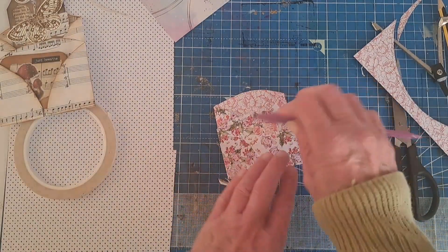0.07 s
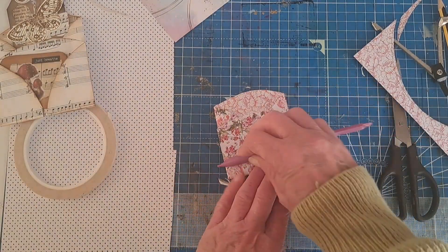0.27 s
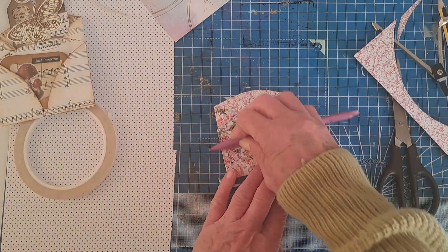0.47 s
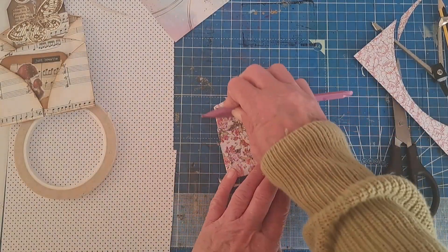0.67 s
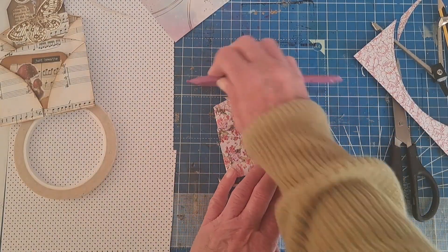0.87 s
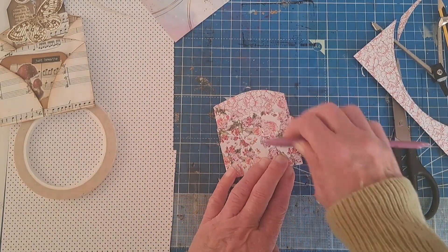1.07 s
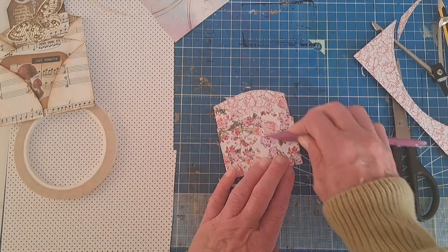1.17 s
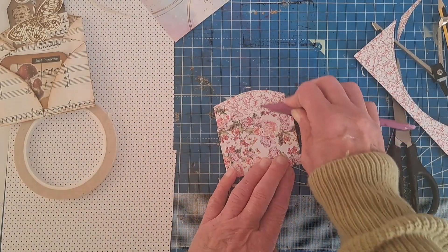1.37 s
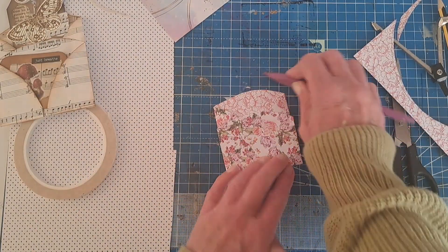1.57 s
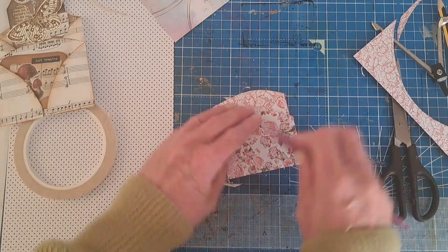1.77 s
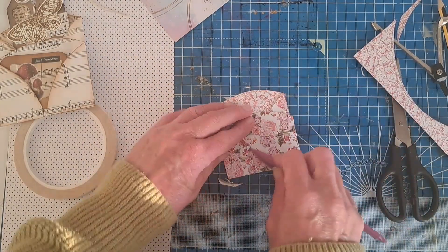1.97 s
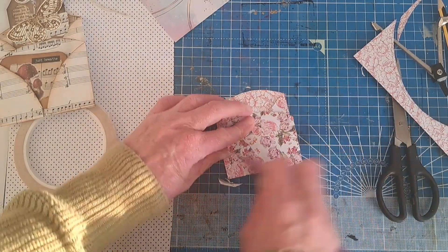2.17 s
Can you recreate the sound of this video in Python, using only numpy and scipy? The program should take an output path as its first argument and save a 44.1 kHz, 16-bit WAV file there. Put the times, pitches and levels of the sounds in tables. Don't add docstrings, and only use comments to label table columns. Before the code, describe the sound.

A hand tool rubs folded paper on a cutting mat: a brief scrape opens, then a lull, soft hissing slides with thumps, and crisp taps later, heard close in a small quiet room.

```python
import sys
import numpy as np
from scipy import signal
from scipy.fft import rfft, irfft, next_fast_len
from scipy.io import wavfile
from scipy.ndimage import map_coordinates

SR = 44100
rng = np.random.default_rng(int(sys.argv[2]) if len(sys.argv) > 2 else 0)


def amplitude_ratio(level_db):
    exponent = np.asarray(level_db, float) / 20
    return 10 ** exponent


def unload_wav(signal):
    wavfile.write(
        sys.argv[1],
        SR,
        np.round(np.clip(np.atleast_2d(signal).T, -1, 1) * 32767).astype(np.int16),
    )


N = 97284
LEAD = 64


def unit(x):
    return x / np.sqrt(np.mean(x ** 2) + 1e-20)


def pan(left_over_right_db):
    return amplitude_ratio(left_over_right_db / 2 * np.array([[1], [-1]]))


def seconds(length):
    return np.arange(length) / SR


def add_at(out, start, sound):
    out[..., start:start + sound.shape[-1]] += sound


def along(points, hz):
    f, value = np.transpose(points)
    return np.interp(np.log(hz + 1), np.log(f + 1), value)


def curves(rows):
    time_s, *columns = np.transpose(rows)
    return [np.interp(np.arange(N) / SR, time_s, column) for column in columns]


def wobble(rate):
    return map_coordinates(rng.standard_normal(N // 20), [np.arange(N) * rate / SR])


def filtered(x, response):
    size = next_fast_len(x.shape[-1] + SR // 4)
    spectrum = rfft(x, size) * response(np.fft.rfftfreq(size, 1 / SR))
    return irfft(spectrum, size)[..., :x.shape[-1]]


def grit(alike, grain_db, rate):
    a, b = rng.standard_normal((2, N))
    turn = np.arccos(np.clip(alike, -1, 1)) / 2
    shared, apart = np.cos(turn) * a, np.sin(turn) * b
    return amplitude_ratio(grain_db * wobble(rate)) * np.array([shared + apart, shared - apart])


# time_s [s], level_db [dB]
DRAG = [(0, -63.5), (.08, -70), (.12, -78), (.25, -87), (.3, -80), (.36, -94.5), (.47, -97), (.53, -80),
        (.65, -78), (.8, -77.5), (.95, -74.5), (1.1, -79.5), (1.19, -82.5), (1.4, -92), (1.62, -89.5),
        (1.72, -106), (1.78, -105), (2.2, -100)]
# centre_hz [Hz], width_hz [Hz], level_db [dB]
TOOL_MODES = [(403, 55, -8.5), (1579, 35, 2.5), (1862, 21.5, 6), (2400, 73, -19), (3030, 29, -22.5)]
# freq_hz [Hz], level_db [dB per Hz]
TOOL_BROAD = [(200, -9.5), (380, 5), (750, -9.5), (1900, -2.5), (3000, -19), (9000, -31.5)]


def drag():
    lag_s = 0.00031

    def body(f):
        total = 0
        for k, (centre, width, db) in enumerate(TOOL_MODES):
            total = total + (-1) ** k * amplitude_ratio(db) * 1j * f * width / (centre ** 2 - f ** 2 + 1j * f * width)
        return total

    def lead(f):
        return np.exp(1j * np.pi * f * lag_s * np.array([[1], [-1]]))

    level_db, = curves(DRAG)
    rough = grit(0.78, grain_db=2.0, rate=340)
    sing = unit(filtered(rough, lambda f: body(f) * lead(f)))
    broad = unit(filtered(rough, lambda f: amplitude_ratio(along(TOOL_BROAD, f)) * (f > 150) * lead(f)))
    stroke = amplitude_ratio(level_db + 12 + 1.3 * wobble(22.4))
    return stroke * (sing + amplitude_ratio(1.5) * broad) * pan(7.5)


# time_s [s], level_db [dB], brightness_db [dB]
SLIDE = [(0, -50.5, -15), (.075, -57, -12), (.13, -75, -6), (.26, -101, 12), (.46, -91.5, 14.5),
         (.54, -71.5, 4), (.75, -60.5, -1.5), (.83, -67, -4.5), (.93, -59, -8.5), (.97, -90, 2),
         (1.205, -97, -18), (1.3, -70.5, -0.5), (1.58, -82.5, 8), (1.74, -72, 6.5), (1.8, -91.5, 5.5),
         (2.1, -68.5, -8.5), (2.16, -65.5, 4.5), (2.2, -81, 5)]
# freq_hz [Hz], level_db [dB per Hz]
PAPER = [(500, -2), (1200, -3.5), (2500, 6), (4000, 4), (6000, -4), (16000, -39)]
# freq_hz [Hz], level_db [dB per Hz]
FIZZ = [(1500, -8.5), (4000, 2.5), (7000, 3.5), (12500, 1), (16000, -5)]


def slide():
    level_db, bright_db = curves(SLIDE)
    body = unit(filtered(grit(0.37, grain_db=-0.5, rate=250), lambda f: amplitude_ratio(along(PAPER, f))))
    fizz = unit(filtered(grit(0.025, grain_db=0.5, rate=350), lambda f: amplitude_ratio(along(FIZZ, f))))
    level_db = level_db + 2.85 * wobble(34.68)
    return amplitude_ratio(level_db - 2.5) * body * pan(-2.4) + amplitude_ratio(level_db + bright_db + 3) * fizz


# freq_hz [Hz], level_db [dB per Hz]
CRACK = [(300, -16.5), (850, -7.5), (1800, -6.5), (3400, -7), (6500, -9.5), (14500, -22.5), (16000, -25)]


def snap(force, hz, treble_db, width, bass_db=0):
    def colour(f):
        treble = treble_db * np.log2(np.clip(f / 3070, 1, 4))
        bass = bass_db * np.log2(np.clip(hz / (f + 1), 1, 8))
        hump = 1 + 1.32 * np.exp(-(np.log((f + 1) / hz) / width) ** 2)
        return amplitude_ratio(along(CRACK, f) + treble + bass) * hump

    size = np.sqrt(np.mean(colour(np.linspace(0, SR / 2, num=400)) ** 2))
    mid, side = filtered(np.pad(force, ((0, 0), (LEAD, 0))), colour) / size
    return np.array([mid + 0.95 * side, mid - 0.79 * side])


# start_s [s], peak_db [dB], ring_hz [Hz], treble_db [dB], left_right_db [dB]
TAPS = [(0.0927, -31.5, 3110, 5, -3.5), (0.199, -45.5, 2300, -2, 5.5), (.218, -52, 8400, 11, 1),
        (0.2965, -39.5, 7400, 2, -7), (0.729, -45.5, 2310, 3, -7), (0.784, -45, 9800, 17, 1),
        (1.2144, -34.5, 1290, -14, 3), (1.2148, -28.5, 3760, 1.5, 3), (1.2149, -33.5, 2620, -3, -5),
        (1.636, -41, 12900, 13, 9), (1.689, -42, 10000, 23, 5), (1.7045, -37, 10850, 18, 9),
        (1.7058, -32, 5980, 8.5, -6), (1.7359, -37, 3160, 6.5, -2.5), (1.8938, -42, 3890, 3, -13),
        (1.9931, -24.5, 3800, -2, -5), (1.994, -34, 7400, 0, 7), (1.9951, -36, 3230, -16, -10),
        (1.997, -55, 3800, 5, -17), (0.164, -59, 5960, 12, 0), (0.2803, -48, 2680, -3, 0),
        (0.4745, -56, 7150, 3, -11), (.738, -51, 5500, 1, 2), (0.7, -52, 8000, 10, -0.5),
        (0.8475, -46.5, 3300, 8, 0), (0.8777, -36.5, 2900, -1.5, -7), (.8825, -44.5, 2160, -10, -20),
        (0.919, -51, 3000, -8, 0), (1.2305, -45, 2580, 3, -10), (1.6805, -52, 12000, 15, 0),
        (1.863, -49.5, 2200, 2, 3)]


def taps():
    crack_db, crack_t60_s = -18.5, 0.013
    rattle_db, rattle_t60_s = -22.5, 0.074
    ring_db, ring_cycles = -13.5, 34
    echo_db, echo_s = -22, 0.00054
    out, t = np.zeros((2, N + SR)), seconds(SR // 8)
    click = np.zeros(len(t))
    click[0] = -1
    click[round(echo_s * SR)] = -amplitude_ratio(echo_db)
    fade = amplitude_ratio(crack_db - 60 * t / crack_t60_s) + amplitude_ratio(rattle_db - 60 * t / rattle_t60_s)
    for s, db, hz, treble_db, pan_db in TAPS:
        force = rng.standard_normal((2, len(t))) * fade + click * [[1.5], [.4]]
        hit = snap(force, hz, treble_db, width=0.23)
        hit[:, LEAD:] += amplitude_ratio(ring_db - 60 * t * hz / ring_cycles) * np.sin(2 * np.pi * hz * t)
        add_at(out, round(s * SR) - LEAD, amplitude_ratio(db) * pan(pan_db) * hit)
    return out[:, :N]


# start_s [s], level_db [dB], pitch_hz [Hz], left_right_db [dB]
RINGS = [
    (1.2138, -36.5, 1285, 12),
    (1.2147, -43, 3900, -3),
    (1.2143, -42, 2510, -9),
    (.2785, -53.5, 2820, -2),
    (.2968, -46, 3830, -6),
    (2.115, -54, 349, 3),
    (1.993, -39, 2713, -3),
    (1.993, -37, 4920, -2),
    (1.629, -47, 1840, 0),
]


def rings():
    out, t = np.zeros((2, N + SR)), seconds(SR // 8)
    for s, db, hz, pan_db in RINGS:
        t60_s = .008 + 36 / hz
        tone = amplitude_ratio(-60 * t / t60_s) * np.sin(2 * np.pi * hz * t) * (1 - np.exp(-t * hz))
        add_at(out, round(s * SR), -amplitude_ratio(db) * pan(pan_db) * tone)
    return out[:, :N]


# start_s [s], level_db [dB], centre_hz [Hz], treble_db [dB], length_s [s]
SCUFFS = [(0.282, -58, 2740, -2, 0.0063), (.3, -71, 4040, 11, 0.03), (0.3832, -65.5, 3450, 0.5, 0.02),
          (0.8732, -49, 2600, -18, 0.015), (0.891, -58, 2300, -7, 0.021), (.918, -53, 2860, -21, 0.012),
          (0.931, -59, 2600, -12, 0.023), (1.227, -63, 3700, 7, 0.065), (1.468, -67, 2440, 7, 0.04),
          (1.487, -58.5, 2330, 5, 0.007), (1.6248, -50, 1790, -3, 0.017), (1.642, -60.5, 2670, -9, 0.06),
          (1.713, -60, 4400, -3, 0.021), (1.8608, -62, 2400, 4, 0.062), (1.888, -66, 3970, 14, 0.0067),
          (1.97, -63.5, 3180, 4, 0.011), (1.9954, -49, 3530, 1.5, 0.011), (2.0, -59.5, 2780, 0, 0.043),
          (.96, -77, 3340, -5, 0.13), (1.049, -72.5, 2980, -17, 0.077), (0.689, -63, 5940, 8, 0.061),
          (0.891, -63, 4030, -19, 0.047), (1.643, -60.5, 1170, -5, 0.037),
          (2.135, -61.5, 2530, -3.5, 0.054)]


def scuffs():
    rise_s = 0.001
    out, t = np.zeros((2, N + SR)), seconds(SR // 8)
    grain = amplitude_ratio(2.4 * np.pad(wobble(550), (0, SR)))
    for s, db, hz, treble_db, length_s in SCUFFS:
        start = round(s * SR)
        swell = (1 - np.exp(-t / rise_s)) * np.exp(-(t / length_s) ** 2.03)
        force = swell * grain[start:start + len(t)] * rng.standard_normal((2, len(t)))
        hit = snap(force, hz, treble_db, width=0.23, bass_db=-3)
        add_at(out, start - LEAD, amplitude_ratio(db) * hit)
    return out[:, :N] * pan(-2.6)


# start_s [s], top_db [dB], legs_db [dB], second_over_first_mode_db [dB], knock_db [dB]
PRESSES = [(0.387, -77, -82, -23, -83), (0.521, -62.5, -71, -8, -82), (0.69, -54.5, -67, -37, -72),
           (0.732, -48, -51, -3, -57.5), (0.772, -46.5, -85, -21, -91), (.84, -48.5, -54, 9.5, -85),
           (0.875, -47.5, -46, -8, -44.5), (.894, -46.5, -72, 12, -49.5), (0.92, -41, -62, 2.5, -54),
           (0.971, -48, -71, -13, -62), (1.039, -54, -70, -28, -79), (1.217, -43.5, -63, 2.5, -49),
           (1.239, -47, -65.5, -3, -55), (1.462, -41.5, -55, 4.5, -64), (1.483, -52, -74, -4, -65.5),
           (1.628, -45.5, -57, 12, -45), (1.646, -51, -60.5, -5, -62), (1.74, -78.5, -63, 11.5, -94),
           (1.888, -65.5, -76, 7.5, -71), (1.996, -39.5, -53.5, -4, -49), (2.019, -40.5, -83, -6, -52),
           (2.113, -61, -78, 2, -58.5)]
# pitch_hz [Hz], level_db [dB], t60_s [s]
TOP_MODES = [(111.7, 4.5, 0.23), (150.2, -1, 0.23)]
# pitch_hz [Hz], level_db [dB], t60_s [s]
LEG_MODES = [(47.26, 16.5, 0.32)]
# pitch_hz [Hz], level_db [dB], t60_s [s]
KNOCK_MODES = [(242.1, 1.5, 0.15), (282.6, -2.5, 0.13), (340.5, -6, 0.14), (378.8, -6, 0.12),
               (444.4, -9.5, 0.135), (610.2, -16, 0.2), (809, -18.5, .2), (1055, -16.5, 0.15)]


def table():
    out, t = np.zeros(N + SR), seconds(SR // 2)

    def ring(modes):
        return np.array([amplitude_ratio(db - 60 * t / t60) * np.sin(2 * np.pi * hz * t) for hz, db, t60 in modes])

    def soft_start(rise_s):
        return 1 - np.exp(-(t / rise_s) ** 2)

    first, second = ring(TOP_MODES) * soft_start(0.0059)
    legs = ring(LEG_MODES).sum(0) * soft_start(0.0098)
    mat = ring(KNOCK_MODES) * soft_start(0.0025)
    for s, db, legs_db, second_db, knock_db in PRESSES:
        knock = amplitude_ratio(rng.normal(0, 1.52, len(mat))) @ mat
        top = amplitude_ratio(db) * (first + amplitude_ratio(second_db) * second)
        add_at(out, round(s * SR), -(top + amplitude_ratio(legs_db) * legs + amplitude_ratio(knock_db) * knock))
    return out[:N]


# start_s [s], level_db [dB], pitch_hz [Hz], rise_s [s], left_right_db [dB]
LEANS = [(.03, -64, 55, 0.011, 3), (0.299, -67, 59, .015, 0), (.373, -50.5, 57, .022, 21),
         (0.459, -65.5, 113, .02, 9), (0.609, -58.5, 56, 0.015, 0), (.66, -56, 70, 0.018, 0),
         (1.01, -56, 47.7, .02, 0), (1.17, -63, 56, 0.025, 2), (1.41, -56.5, 57, 0.026, 0.5),
         (1.759, -53.5, 46, 0.028, 4), (2.17, -58.5, 60, .015, -2)]


def leans():
    out, t = np.zeros((2, N + SR)), seconds(SR // 4)
    for s, db, hz, rise_s, pan_db in LEANS:
        swell = (t / rise_s) ** 2 * np.exp(2 - 2 * t / rise_s)
        add_at(out, round(s * SR), amplitude_ratio(db) * pan(pan_db) * swell * np.sin(2 * np.pi * hz * t))
    return out[:, :N]


# freq_hz [Hz], t60_s [s]
ROOM = [(100, 0.41), (12000, 0.14)]


def room(x):
    out, hop = np.zeros((2, N + 2 * SR)), SR // 4
    for start in range(0, N, hop):
        hz, t, z = signal.stft(rng.standard_normal((2, SR // 2)), SR, nperseg=256)
        decay = amplitude_ratio(-60 * t / along(ROOM, hz)[:, None])
        tail = signal.istft(z * decay, SR, nperseg=256)[1]
        tail = tail / np.linalg.norm(tail[0])
        wet = signal.fftconvolve(x[None, start:start + hop], tail, axes=1)
        add_at(out, start + 150, wet)
    return out[:, :N]


# freq_hz [Hz], level_db [dB per Hz]
FLOOR = [(50, -0.5), (110, 4.5), (300, -27.5), (1500, -49), (3000, -29), (8000, -21.5), (15800, -25)]


def floor():
    return amplitude_ratio(-72) * unit(filtered(grit(.4, grain_db=-3.5, rate=30), lambda f: amplitude_ratio(along(FLOOR, f))))


def scene():
    near = drag() + slide() + taps() + rings() + scuffs()
    thump = table()
    wet = room(amplitude_ratio(-9.5) * near.mean(0) + amplitude_ratio(-16) * thump)
    return near + thump * pan(-.6) + wet + leans() + floor()


def band_limit(x):
    return signal.sosfilt(signal.butter(12, 16120, fs=SR, output="sos"), x)


def record(dry):
    bass_cut_hz, top_hz = 30, 15830
    heard = filtered(dry, lambda f: (1j * f / (bass_cut_hz + 1j * f)) ** 2 * (f < top_hz))
    return band_limit(heard)


dry = scene()
out = record(dry)
unload_wav(out)
```